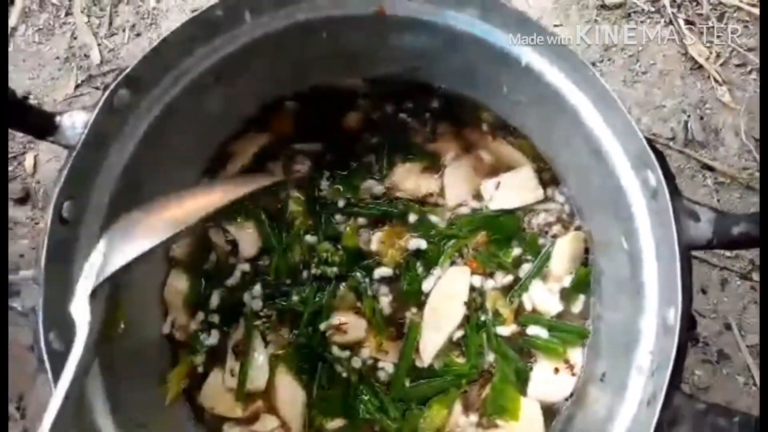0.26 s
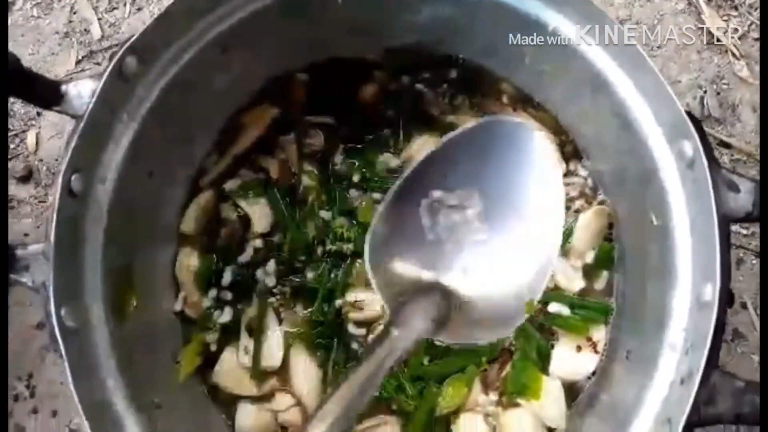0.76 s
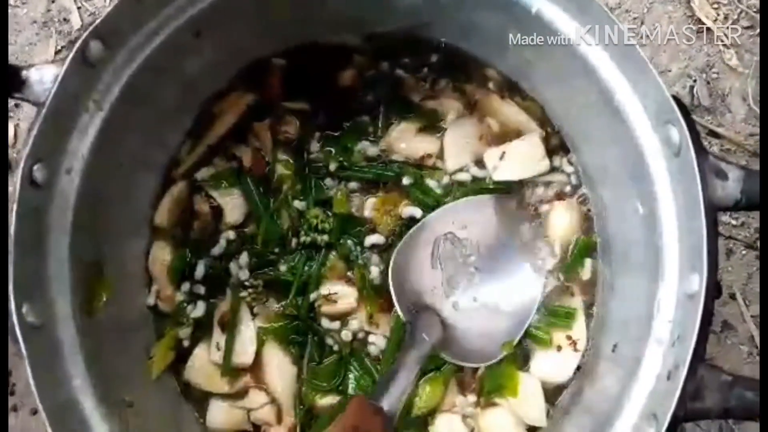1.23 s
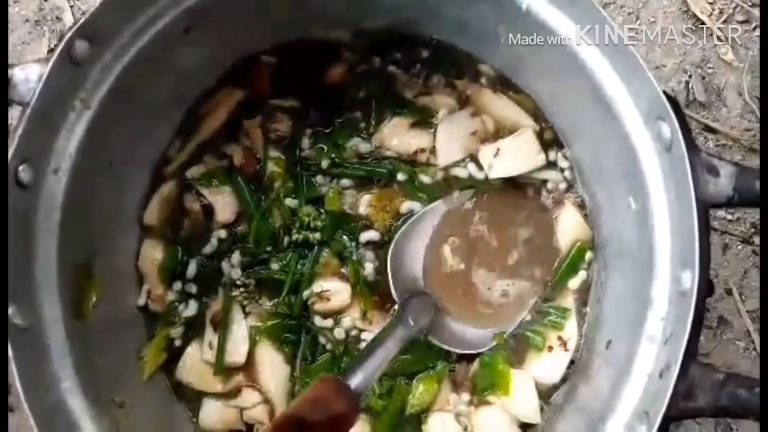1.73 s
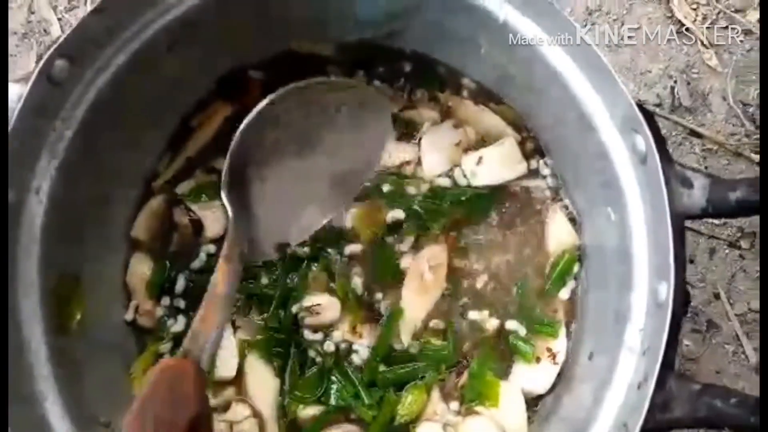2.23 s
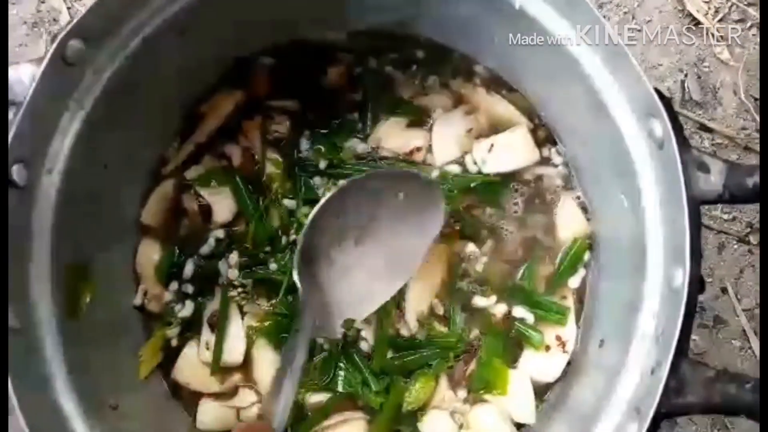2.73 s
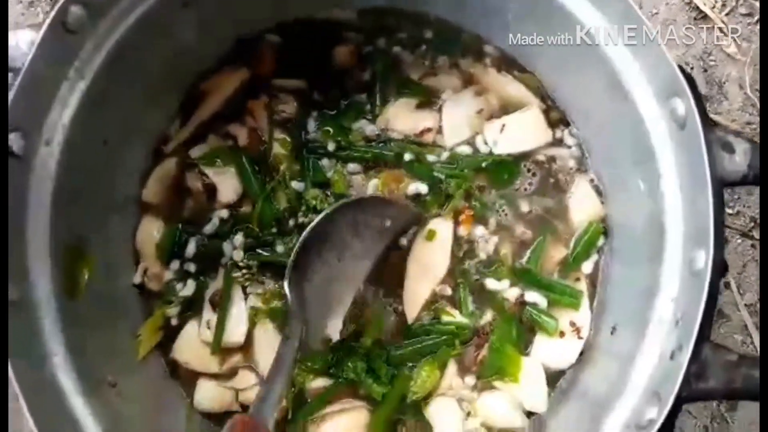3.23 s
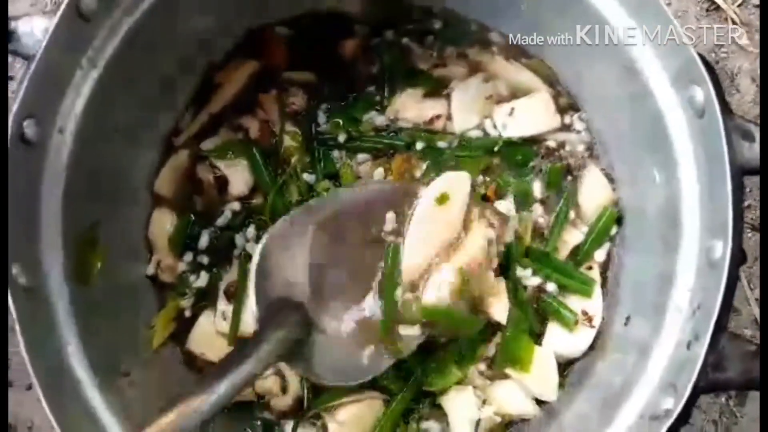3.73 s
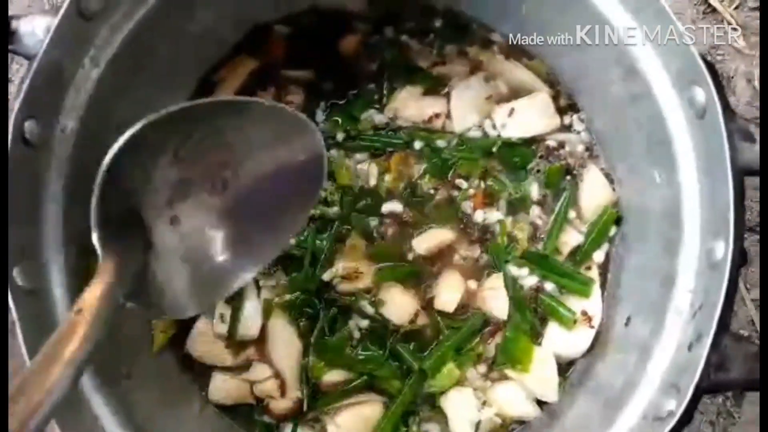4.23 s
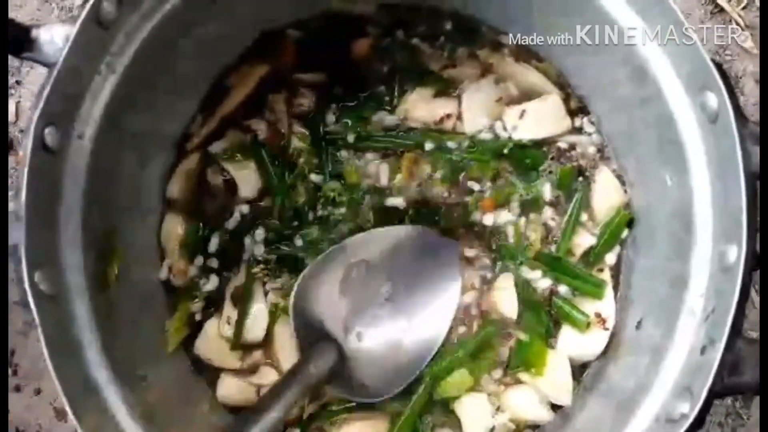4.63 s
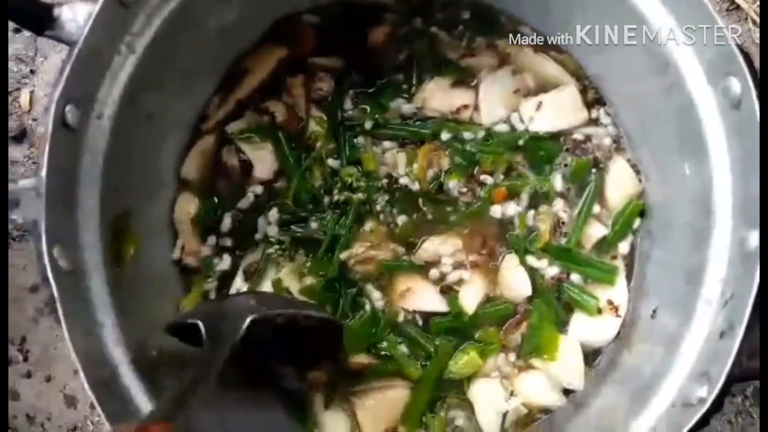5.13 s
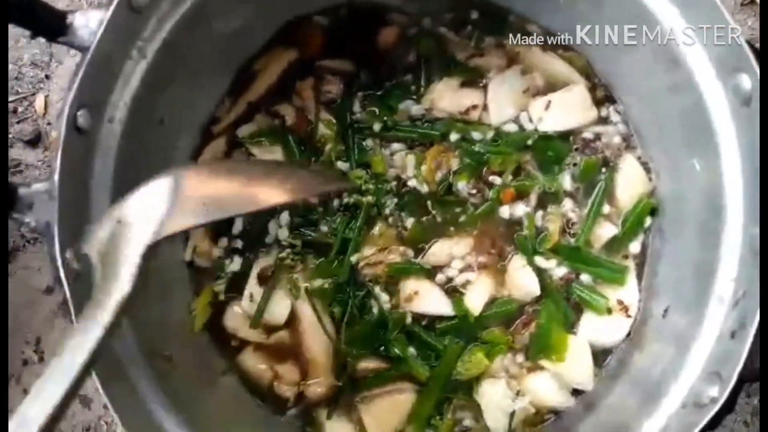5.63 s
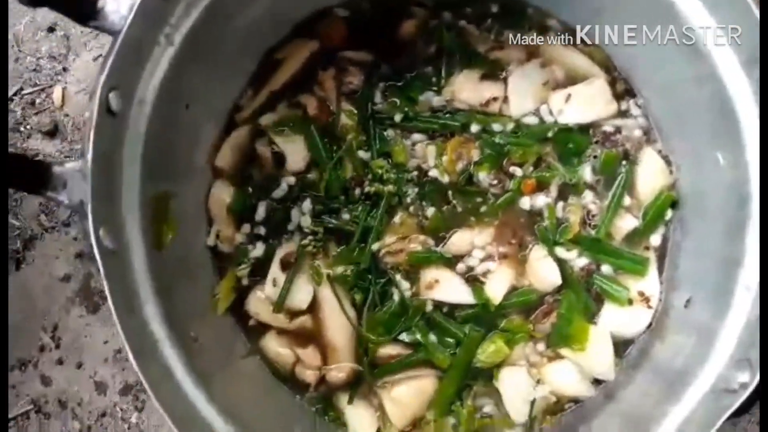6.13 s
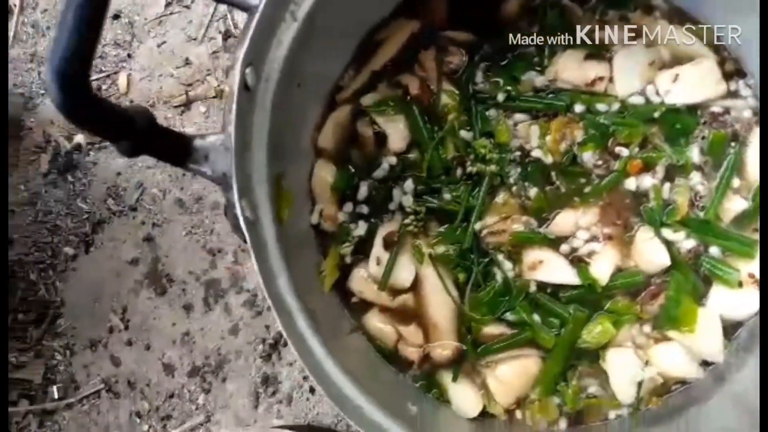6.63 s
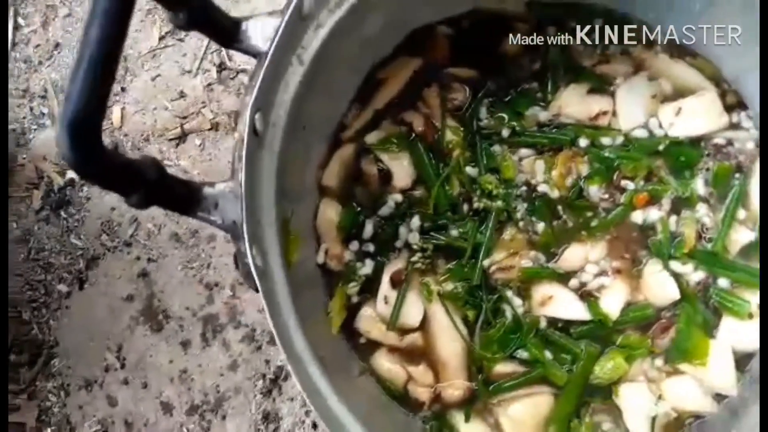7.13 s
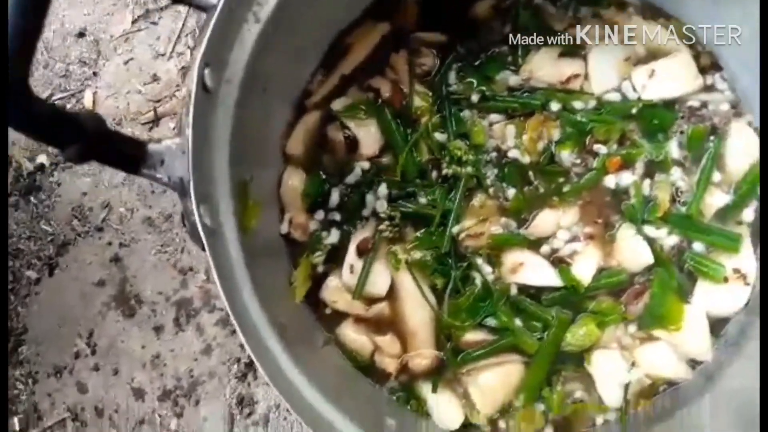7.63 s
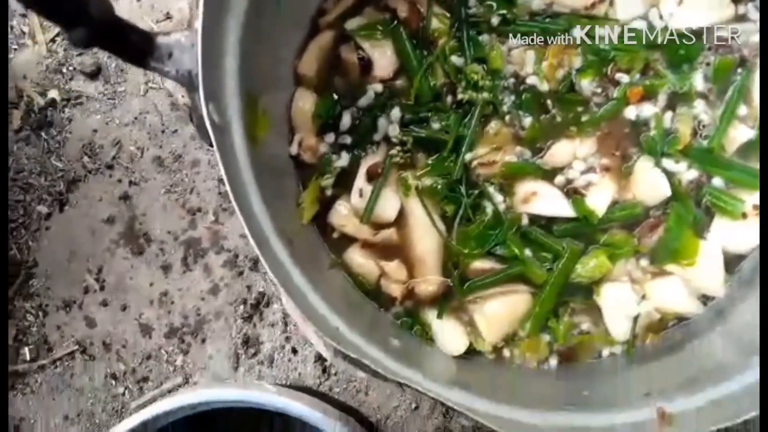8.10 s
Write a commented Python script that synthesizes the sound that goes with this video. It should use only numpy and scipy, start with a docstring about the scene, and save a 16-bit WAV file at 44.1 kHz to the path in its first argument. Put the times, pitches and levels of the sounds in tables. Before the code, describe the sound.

A metal ladle drips and knocks in a softly simmering pot, then a metal lid rings, scrapes and clatters on the ground.

```python
"""A soft bubbling grows: soup simmers in an aluminium pot over an outdoor fire, each bubble a small
resonator, while a bird whistles in the trees. A ladle dips, drips, stirs and knocks against the pot
wall. Beside the pot a metal lid is struck and rings on with clear, beating tones; then, damped by
touch, it is shifted, dragged over the ground and set down with a clatter. Impacts excite the normal
modes of the metal; friction on grit drives those of the sliding lid."""
import sys
import numpy as np
from scipy import signal
from scipy.fft import rfft, irfft
from scipy.io import wavfile

SR = 44100
rng = np.random.default_rng(int(sys.argv[2]) if len(sys.argv) > 2 else 0)


def transcribe(u):
    """Save the signal u as a 16-bit wav file named by the first command-line argument.

    u: samples, shape (n,) or (channels, n), limited to [-1, 1]; the rate is SR.
    q: integer samples, one column per channel.
    """
    v = np.clip(np.atleast_2d(u).T, -1, 1)
    q = np.round(v * 32767).astype(np.int16)
    wavfile.write(sys.argv[1], SR, q)


N = 368676
TIME = np.arange(N) / SR

# noise spectra of the air and of the pot's stand: f/Hz, relative level/dB
AIR_SPECTRUM = [(30, 5.5), (200, 1.5), (1000, -6.5), (3000, -10.5), (7000, -13), (13000, -14)]
STAND_SPECTRUM = [(20, -9.5), (50, -4.5), (95, 4), (140, -6.5), (250, -12), (400, -38)]
# faint tones that swell and fade by chance: f/Hz, bandwidth/Hz, level/dB
FAINT_TONES = [(1780, 130, -85.5), (2400, 100, -90), (6950, 350, -93)]
# their clearest swells: t/s, duration/s, f/Hz, level/dB
CLEAR_SWELLS = [(2.773, .19, 2380, -78), (2.9, 0.24, 1850, -76.5), (3.3, 0.2, 1882, -76),
                (5.848, .5, 2360, -84.5)]
# dull thuds through the stand and the ground: t/s, level/dB
STAND_THUDS = [(3.129, -73), (3.4, -57.5), (4.57, -56), (4.905, -45), (6.311, -67.5), (6.73, -51.5),
               (7.23, -81), (7.7, -65), (7.85, -61), (8.28, -63.5)]

# contour of the bird's rising whistle: t/s from its onset, f/Hz, relative level/dB
WHISTLE_CONTOUR = [(0, 3700, -2), (.025, 4000, 5), (.06, 4400, 2.5), (.1, 4960, -0.5), (.135, 5320, 5),
                   (.16, 6500, 7.5), (.18, 6800, -5)]
# whistles: t/s, level/dB
BIRD_WHISTLES = [(-.15, -70.5), (0.587, -71), (2.222, -71.5), (3.003, -68.5)]
# short calls: t/s, f/Hz, level/dB
BIRD_CHIPS = [(1.018, 6300, -58.5), (1.045, 6500, -64.5), (3.985, 6600, -64.5), (4.209, 5650, -71),
              (6.123, 6440, -58)]

# filter for bubbling heard through the vegetables: f/Hz, relative gain/dB
SOUP_FILTER = [(120, -55), (200, -24), (291, -21), (342, -12), (409, -4), (605, 5), (724, 0), (909, -15.5),
               (995, -23.5), (1170, -16), (1230, -31), (1400, -39), (1820, -57), (3080, -120)]
# resonances of the air cavity above the soup: f/Hz, bandwidth/Hz, relative gain/dB
CAVITY_MODES = [(1194, 94, 6.5), (1700, 140, -12.5), (2390, 70, -15)]
# ladle strokes through the soup: t/s, duration/s, gurgle level/dB, cavity level/dB
LADLE_STIRS = [(2.84, 0.53, -70, -77.5), (3.306, 0.36, -55.5, -77), (3.53, 0.62, -91, -73.5),
               (4.08, 0.44, -86, -73.5), (4.903, .42, -58.5, -67.5)]
# drops and single bubbles: t/s, f/Hz, level/dB, t60/s, share of splat (0-1)
SOUP_DROPS = [(0.278, 1350, -66, 0.12, 0.4), (1.058, 1780, -55.5, 0.19, 0.6),
              (1.206, 520, -44.5, 0.074, 0.1), (1.37, 1150, -67, 0.093, 0.3), (1.609, 1130, -67, .1, 0.2),
              (2.072, 3600, -48.5, 0.017, 0.97), (2.14, 1114, -55.5, 0.17, 0.15),
              (2.351, 1313, -75, 0.13, 0.4), (2.699, 1130, -64, .1, 0), (3.42, 304, -57, 0.37, 0.93),
              (3.846, 1850, -35, 0.037, 0.55), (3.893, 3236, -34.5, 0.019, 0.4),
              (3.926, 3200, -49, 0.011, 0.9), (3.96, 608, -42, .035, 0), (4.08, 2120, -47.5, 0.039, 0.17),
              (4.088, 2570, -45, 0.029, 0.23), (4.565, 560, -23.5, .035, 0.61), (5.27, 1600, -61, .15, .3),
              (5.659, 1256, -61.5, 0.095, 0.5), (6.894, 1115, -35.5, 0.071, 0.26)]
# light touches of the ladle: t/s, level/dB, t60/s, tilt/(dB per octave)
LADLE_TICKS = [(1.052, -37.5, 0.028, 1), (1.064, -43, 0.01, 2), (2.071, -54.5, 0.038, 4.5),
               (3.845, -47.5, 0.042, 3), (3.875, -54, 0.028, 2), (3.897, -52, 0.019, 6),
               (4.024, -52, 0.02, 3), (4.084, -55, 0.2, 17.5), (4.563, -30, 0.029, 2.5),
               (4.574, -36.5, 0.027, -1)]

# normal modes of the ladle held to the pot wall, the free lid and the handled lid: f/Hz, level/dB, t60/s
LADLE_PARTIALS = [(94.9, -37.5, 0.57), (351, -23.5, 0.098), (484, -24.5, 0.24), (929, -13, 0.061),
                  (1208.5, 1.5, 0.068), (1277, -14, 0.18), (1750, -5, 0.094), (1850, -8.5, 0.08),
                  (2323, -9.5, 0.083), (6500, -9, 0.026), (8000, -3.5, 0.013)]
LID_RING_PARTIALS = [(291, -31, 1.5), (668, -27, 1.5), (834, -22, .3), (947, -21, .55), (2180, -2, .53),
                     (2390, -9, .2), (2767, -11, .33), (2923, -12, .41), (3241, -10, .26), (3365, -13, .25),
                     (4043, -28, .24), (4447, -30, .3), (5001, -21, .2), (6342, -12, .11)]
LID_PARTIALS = [(215, -26, .2), (291, -28, .25), (605, -16, .2), (678, -17, .21), (912, -17, .25),
                (1030, -11, .15), (1150, -11, .2), (1205, -10, .13), (1750, -15, .12), (1545, -30, 1.4),
                (2175, -24, .5), (2308, -8, .2), (2358, -7, .22), (2493, 2, .2), (2687, -15, .55),
                (2789, -14, .26), (2943, -9, .2), (3243, -8, .16), (3814, -21, .17), (4046, -16, .22),
                (4838, -21, .11), (5127, -22, .15), (6535, -21, .12)]
# the two halves of a split mode of the free lid: f/Hz, level/dB, t60/s
LID_RING_DOUBLET = [(1540.9, -30, .5), (1551.1, -34, .8)]
# spectra of the clash, the dense and quickly damped modes of a body: f/Hz, relative level/dB
TICK_SPECTRUM = [(150, -21), (620, 0.5), (1000, -2), (1400, 4.5), (2500, 3), (4500, -8), (8000, 0),
                 (13000, -5)]
LADLE_SPECTRUM = [(100, -32.5), (250, -10.5), (900, 2), (1800, -7), (3000, -5.5), (5000, -20), (6800, -7),
                  (9000, -25.5), (13000, -34.5)]
LID_RING_SPECTRUM = [(30, -24), (100, -19.5), (300, -9), (650, -2), (800, -19), (1250, -3.5), (1700, -9.5),
                     (2500, 1), (4000, -12), (5600, -9), (6700, -2.5), (9000, -7.5), (13000, -18.5)]
LID_SPECTRUM = [(30, -27), (110, -14), (180, -11), (400, -8), (600, -3), (800, -2.5), (1150, 4.5),
                (1450, 0), (2500, 7), (3500, -13), (4400, -8), (5700, -16), (6600, -7), (8500, -15),
                (13000, -33)]
# blows: t/s, clash level/dB, clash t60/s, tilt/(dB per octave), ring level/dB, factor on modal t60
LADLE_IMPACTS = [(4.8965, -15, 0.022, 5, -40, 1), (4.897, -21.5, 0.093, -1, -12, 0.88),
                 (4.914, -41.5, 0.15, -1, -20, .8), (5.008, -54, 0.39, -3, -72, 1)]
LID_RING_IMPACTS = [(6.3009, -13.5, 0.081, -0.51, -15.5, 1), (6.329, -26.5, 0.093, -1.2, -74.5, 0.28)]
LID_IMPACTS = [(6.613, -23.5, 0.13, 3, -29.5, 0.49), (6.634, -22.5, 0.21, -3, -38.5, 3.1),
               (6.7225, -15.5, 0.095, 5, -22, 0.82), (6.730, -29.5, 0.26, -14.5, -29, 0.88),
               (7.2172, -24, 0.11, -0.5, -20.5, 0.44), (7.808, -19.5, .07, 3.5, -21, 0.19),
               (7.8105, -14, 0.098, 2, -21, 0.95), (8.002, -47.5, 0.057, 18, -71, 0.58),
               (8.096, -28.5, 0.16, 0, -38.5, 1.3), (8.272, -40, 0.16, -1, -42.5, 0.6)]
# first bounce of each lid rattle: t/s, clash level/dB, tilt/(dB per octave), ring level/dB
LID_RATTLES = [(6.755, -27, 1.5, -29.5), (7.828, -21, -0.5, -16.5)]
# friction spectrum of the lid on the ground: f/Hz, relative level/dB
FRICTION_SPECTRUM = [(30, -31), (100, -17.5), (300, 0.5), (700, 5), (1100, 3), (1700, -4), (2000, -5),
                     (2650, 5.5), (3400, -28), (4500, -6.5), (5200, -16.5), (5900, -25), (6400, -12),
                     (8300, -15), (10000, -27), (13000, -25.5)]
# pushes of the lid: t/s, duration/s, level/dB
LID_SLIDES = [(6.809, .13, -58), (6.93, 0.16, -60.5), (7.24, 0.15, -54), (7.45, 0.59, -58),
              (7.566, 0.19, -52), (7.73, 0.3, -52), (8.225, 0.17, -54.5)]

STIR_EDGE_S, SLIDE_EDGE_S = 0.24, 0.066   # rise and fall times of a stroke


def amp(db):
    """Amplitude ratio of a level in decibels."""
    return 10 ** (np.asarray(db) / 20)


def rms_one(x):
    """Normalisation to unit rms."""
    return x / np.sqrt(np.mean(x ** 2) + 1e-20)


def add(out, onset, sound):
    """Superposition: a sound joins the mix at its onset in seconds."""
    i = round(onset * SR)
    sound, i = sound[max(-i, 0):], max(i, 0)
    out[i:i + len(sound)] += sound[:N - i]


def decay(t, t60):
    """Exponential damping: 60 dB down after t60."""
    return np.exp(-np.log(1000) * t / t60)


def rise(t, tau):
    """First-order growth towards 1 with time constant tau."""
    return 1 - np.exp(-t / tau)


def stroke(onset, duration, edge_s):
    """Envelope of one push, with quarter-sine rise and fall."""
    inside_s = np.minimum(TIME - onset, onset + duration - TIME)
    return np.sin(np.pi / 2 * np.clip(inside_s / edge_s, 0, 1))


def drift(per_s):
    """Slow random modulation of unit rms."""
    knots = rng.standard_normal(1024)
    return rms_one(np.interp(TIME * per_s, np.arange(len(knots)), knots))


def impulses(per_s, spread_db=2.5):
    """A Poisson process: independent clicks of uneven size and sign."""
    occurs = rng.random(N) < per_s / SR
    size = amp(spread_db * np.minimum(rng.exponential(1, N), 4))
    return occurs * size * rng.choice([-1, 1], N)


def resonate(x, hz, width, stages=1):
    """Forced response of two-pole resonators in cascade, each of unit peak gain."""
    r = np.exp(-np.pi * width / SR)
    numerator = np.array([1, 0, -1]) * (1 - r * r) / 2
    denominator = [1, -2 * r * np.cos(2 * np.pi * hz / SR), r * r]
    for _ in range(stages):
        x = signal.lfilter(numerator, denominator, x + 1e-18)
    return x


def colour(x, spectrum, tilt_db=0):
    """Spectral shaping on a log-frequency axis, tilted per octave above 500 Hz; unit rms."""
    hz = np.fft.rfftfreq(len(x), 1 / SR)
    knot_hz, knot_db = np.transpose(spectrum)
    gain_db = np.interp(np.log(hz + 1), np.log(knot_hz), knot_db)
    octaves = np.log2(np.maximum(hz, 500) / 2000)
    return rms_one(irfft(rfft(x) * amp(gain_db + tilt_db * octaves), len(x)))


def mode_pattern():
    """Statistical modes: random heights for the many resonances of a thin sheet."""
    return np.clip(rng.standard_normal(2048), -1.8, 1.8)


def ripple(x, pattern, spacing_hz, depth_db=5):
    """Modal overlap leaves peaks and gaps all over a thin sheet's spectrum; unit rms."""
    hz = np.fft.rfftfreq(len(x), 1 / SR)
    heights = np.interp(hz / spacing_hz, np.arange(len(pattern)), pattern)
    return rms_one(irfft(rfft(x) * amp(depth_db * heights), len(x)))


def echoes(x, t60, wet_db, tilt_db=0):
    """Diffuse reflection from walls and trees: convolution with decaying noise."""
    t = TIME[:SR]
    noise = colour(rng.standard_normal(SR), [(100, 0.003), (10000, 0)], tilt_db)
    response = noise * decay(t, t60) * rise(t, 0.0071)
    return amp(wet_db) * signal.fftconvolve(x, response / np.linalg.norm(response))[:len(x)]


def narrow_noise(hz, width, samples=N):
    """Narrow-band noise, heard as a wavering pitch; unit rms."""
    return rms_one(resonate(rng.standard_normal(samples), hz, width, stages=2))


def background():
    """Broadband noise of the air, with amplitude-modulated thin tones that come and go."""
    out = amp(-76.5) * colour(rng.standard_normal(N), AIR_SPECTRUM)
    for hz, width, db in FAINT_TONES:
        out += amp(db) * np.maximum(drift(per_s=6.3), 0) * narrow_noise(hz, width)
    for onset, duration, hz, db in CLEAR_SWELLS:
        out += amp(db) * stroke(onset, duration, duration / 2) * narrow_noise(hz, width=79)
    return out


def stand_rumble():
    """Structure-borne sound: the stand rumbles faintly, more under stirring, and booms at each thud."""
    stirring = sum(stroke(onset, duration, STIR_EDGE_S) for onset, duration, *_ in LADLE_STIRS)
    shake = amp(-91) + amp(-80.5) * stirring
    t = TIME[:SR]
    for onset, db in STAND_THUDS:
        add(shake, onset, amp(db) * rise(t, 0.047) * decay(t, t60=0.46))
    return shake * colour(rng.standard_normal(N), STAND_SPECTRUM)


def bird_note(contour):
    """Frequency modulation: a sine follows a pitch contour with a quick random burr."""
    knot_s, hz, db = np.transpose(contour)
    t = TIME[:int(knot_s[-1] * SR)]
    burr = np.interp(t * 500, np.arange(256), rng.normal(0, .025, 256))
    pitch = np.interp(t, knot_s, hz) * (1 + burr)
    envelope = amp(np.interp(t, knot_s, db)) * signal.windows.tukey(len(t), .15)
    return envelope * np.sin(2 * np.pi * np.cumsum(pitch) / SR)


def bird():
    """Rising whistles and short chips arrive directly and smeared by scattering from the trees."""
    calls = [(onset, db, WHISTLE_CONTOUR) for onset, db in BIRD_WHISTLES]
    for onset, hz, db in BIRD_CHIPS:
        calls.append((onset, db, [(0, hz * .95, -4), (.025, hz, 0), (.05, hz * 1.04, -4)]))
    out = np.zeros(N)
    for onset, db, contour in calls:
        note = np.pad(bird_note(contour), (0, SR // 2))
        add(out, onset, amp(db) * (amp(-2) * note + echoes(note, t60=0.31, wet_db=-0.5)))
    return out


def simmer():
    """Bubble resonance, muffled by vegetables; bursts excite the pot's cavity. Stirring raises both."""
    start_db, growth_s, swell_db = -9, 1.25, 0.93
    vigour = amp(start_db * np.maximum(1 - TIME / growth_s, 0) - swell_db * drift(per_s=5.5))
    gurgle_gain, cavity_gain = amp(-57.5) * vigour, amp(-85) * vigour
    for onset, duration, gurgle_db, cavity_db in LADLE_STIRS:
        effort = stroke(onset, duration, STIR_EDGE_S)
        gurgle_gain = np.hypot(gurgle_gain, amp(gurgle_db) * effort)   # incoherent sounds add in power
        cavity_gain = np.hypot(cavity_gain, amp(cavity_db) * effort)
    pops = impulses(per_s=800)
    pitches = np.geomspace(300, 1000, 14)
    pitch_index = rng.integers(0, len(pitches), N)
    bubbles = sum(resonate(pops * (pitch_index == k), hz, hz / 9) / np.sqrt(hz)
                  for k, hz in enumerate(pitches))
    bursts = impulses(per_s=260)
    cavity = sum(amp(db + 1.5 * drift(per_s=10)) * resonate(bursts, hz, width, stages=2)
                 for hz, width, db in CAVITY_MODES)
    return gurgle_gain * colour(bubbles, SOUP_FILTER) + cavity_gain * rms_one(cavity)


def drops():
    """Each drop is a noisy splat and a damped bubble oscillation that rises in pitch."""
    out, t = np.zeros(N), TIME[:SR // 5]
    for onset, hz, db, t60, splat_share in SOUP_DROPS:
        pitch = hz * (1 + .8 * np.minimum(t / t60, 1))
        bubble = np.sin(2 * np.pi * np.cumsum(pitch) / SR)
        splat = narrow_noise(hz, hz / 2, len(t))
        drop = (1 - splat_share) * bubble + splat_share * splat
        add(out, onset, amp(db) * drop * decay(t, t60) * rise(t, 0.0015))
    return out


def clash(spectrum, pattern, t60, tilt_db):
    """A contact transient, then dense modes of thin metal; damping is stronger in the treble."""
    t = TIME[:SR // 2]
    noise = colour(rng.standard_normal(len(t)), spectrum, tilt_db)
    dense = ripple(noise, pattern, spacing_hz=68.3)
    low = signal.sosfiltfilt(signal.butter(2, 3600, fs=SR, output="sos"), dense)
    treble = dense - low
    crack = 1 + amp(-2) * np.exp(-t / 0.0028)
    return (low * decay(t, t60) + treble * decay(t, 0.89 * t60)) * rise(t, 0.0021) * crack


def ladle_ticks():
    """Light impacts of the ladle excite only a brief clash."""
    out = np.zeros(N)
    for onset, db, t60, tilt_db in LADLE_TICKS:
        add(out, onset, amp(db) * clash(TICK_SPECTRUM, mode_pattern(), t60, tilt_db))
    return out


def struck(impacts, modes, spectrum, spread_db):
    """Modal superposition: each point of impact weights the modes anew; the grip sets their damping."""
    out, t = np.zeros(N), TIME[:SR]
    pattern = mode_pattern()   # shared by all these blows on one body
    hz, mode_db, mode_t60 = np.transpose(modes)[:, :, None]
    for onset, clash_db, clash_t60, tilt_db, ring_db, t60_factor in impacts:
        weights = amp(ring_db + mode_db + spread_db * rng.standard_normal(hz.shape))
        lead_s = rng.uniform(.003, .012)   # common to all modes, so close ones start in step
        partials = np.sin(2 * np.pi * hz * (t + lead_s)) * decay(t, mode_t60 * t60_factor)
        add(out, onset, (weights * partials).sum(axis=0) * rise(t, 0.00064))
        add(out, onset, amp(clash_db) * clash(spectrum, pattern, clash_t60, tilt_db))
    return out


def ladle_knock():
    """Damped vibration: held against the pot wall, the ladle rings only briefly."""
    return struck(LADLE_IMPACTS, LADLE_PARTIALS, LADLE_SPECTRUM, spread_db=2)


def lid_drag():
    """Friction: fine grit rasps under the sliding lid and drives its modes."""
    grit = impulses(per_s=6000 * amp(4 * drift(per_s=30)))
    ringing = sum(amp(db) * t60 * resonate(grit, hz, width=np.log(1000) / (np.pi * t60))
                  for hz, db, t60 in LID_PARTIALS)
    rasp = ripple(colour(grit, FRICTION_SPECTRUM), mode_pattern(), spacing_hz=130)
    lid_down_s, creep_db = 6.8, -67.5   # once down, the lid keeps creeping faintly
    motion = amp(creep_db) * np.clip((TIME - lid_down_s) / SLIDE_EDGE_S, 0, 1)
    for onset, duration, db in LID_SLIDES:
        motion = np.maximum(motion, amp(db) * stroke(onset, duration, SLIDE_EDGE_S))
    return motion * (amp(-6) * rms_one(ringing) + amp(3.5) * rasp)


def lid_clatter():
    """Inelastic collisions: after a hard landing the lid rocks in even, ever weaker bounces."""
    gap_s, loss_db, clash_t60, t60_factor = .023, 5.5, 0.092, 0.58
    bounces = [(onset + k * gap_s, clash_db - k * loss_db, clash_t60,
                tilt_db, ring_db - k * loss_db, t60_factor)
               for onset, clash_db, tilt_db, ring_db in LID_RATTLES for k in range(4)]
    return struck(LID_IMPACTS + bounces, LID_PARTIALS, LID_SPECTRUM, spread_db=2)


def lid_ring():
    """Free vibration of the struck lid: clear tones, a beating split mode and a shimmer of weak modes."""
    out = struck(LID_RING_IMPACTS, LID_RING_PARTIALS, LID_RING_SPECTRUM, spread_db=.2)
    t = TIME[:SR // 2]
    in_phase_s = .03   # the two halves reinforce just after the blow
    beating = sum(amp(db) * np.sin(2 * np.pi * hz * (t - in_phase_s)) * decay(t, t60)
                  for hz, db, t60 in LID_RING_DOUBLET)
    shimmer = amp(-46) * clash(LID_RING_SPECTRUM, mode_pattern(), t60=0.88, tilt_db=-6)
    add(out, LID_RING_IMPACTS[0][0], beating + shimmer)
    return out


def scene():
    """Superposition of nearby metal and its reflections in an open yard with the quieter sources."""
    ladle = ladle_knock()
    handled_lid = lid_clatter() + lid_drag()
    touches = ladle_ticks() + drops()
    direct = ladle + lid_ring() + handled_lid + touches
    yard = echoes(direct, t60=.45, wet_db=-35, tilt_db=-.8)
    yard += echoes(touches, t60=0.51, wet_db=-13, tilt_db=-1.3)
    return (direct + yard + simmer() + bird() + stand_rumble() + background())[None]


def record(dry):
    """Band limiting: a steep low-pass filter removes the highest treble."""
    cutoff_hz = 13300
    return signal.sosfilt(signal.ellip(10, .2, 70, cutoff_hz, fs=SR, output="sos"), dry)


dry = scene()
out = record(dry)
transcribe(out)
```